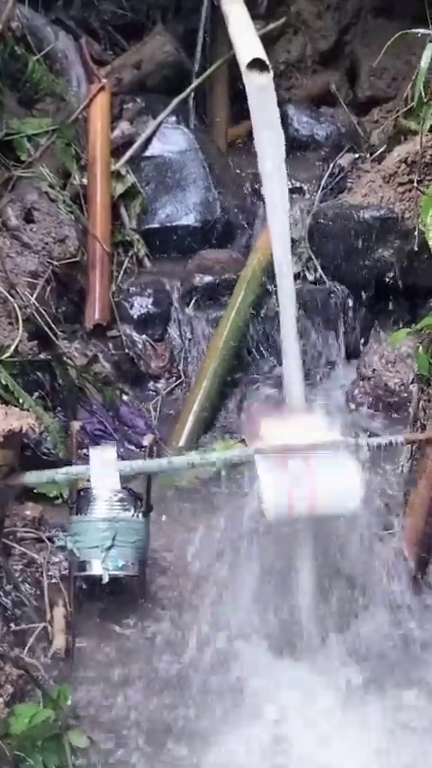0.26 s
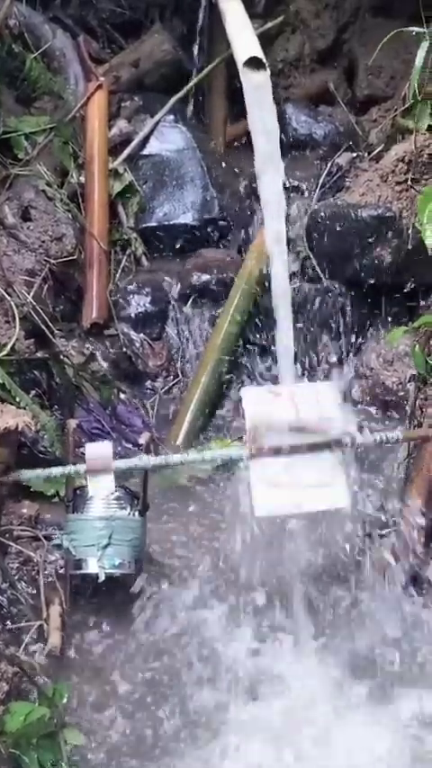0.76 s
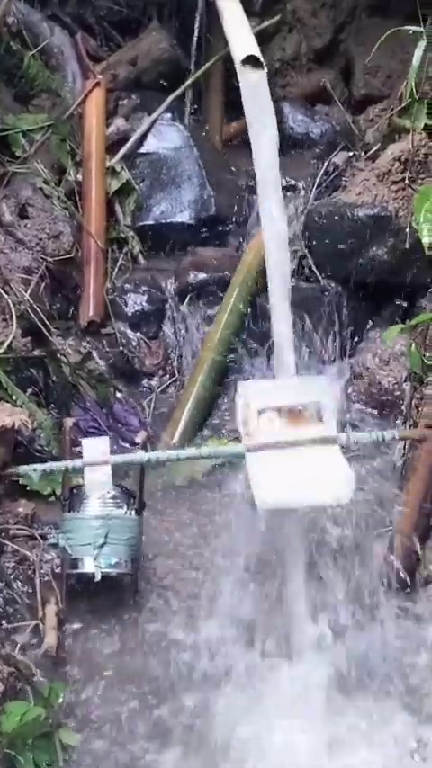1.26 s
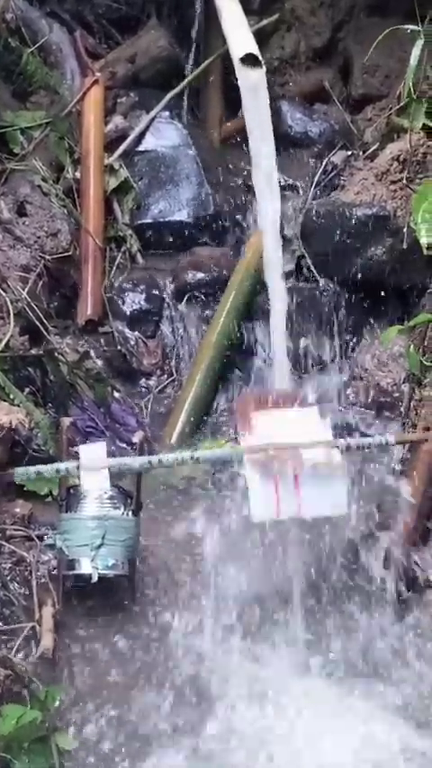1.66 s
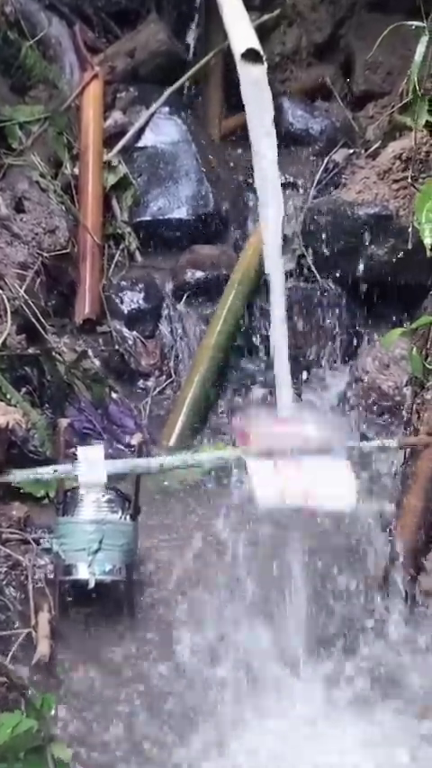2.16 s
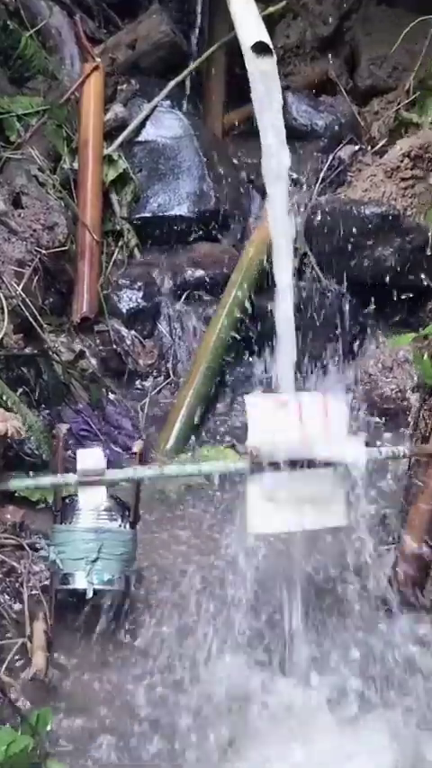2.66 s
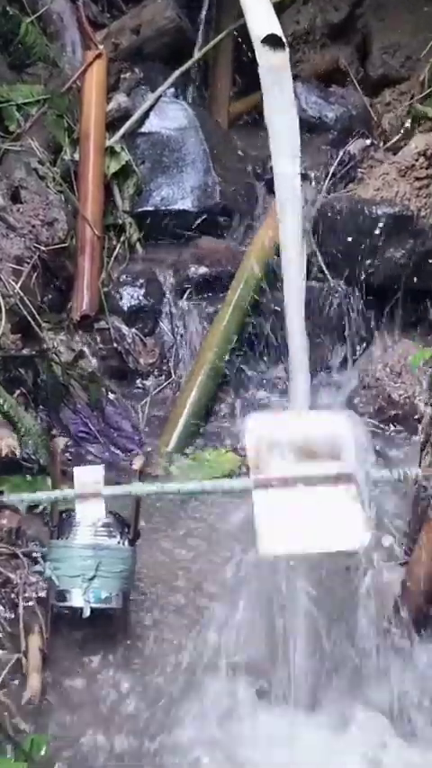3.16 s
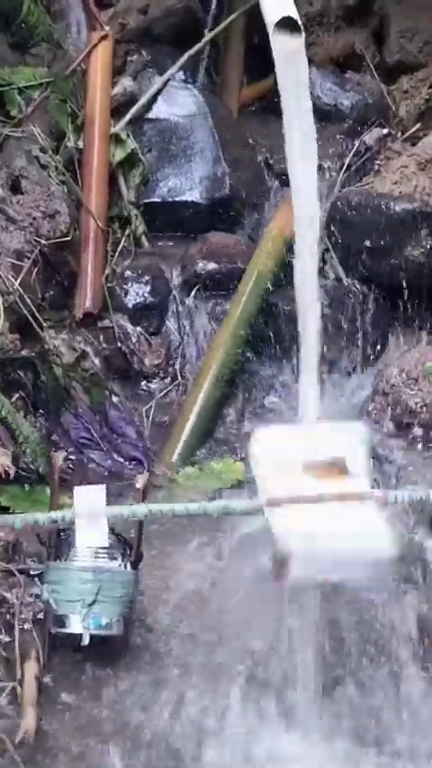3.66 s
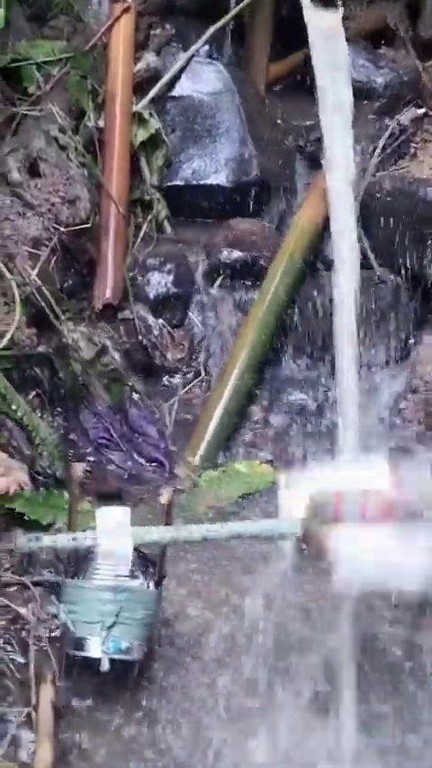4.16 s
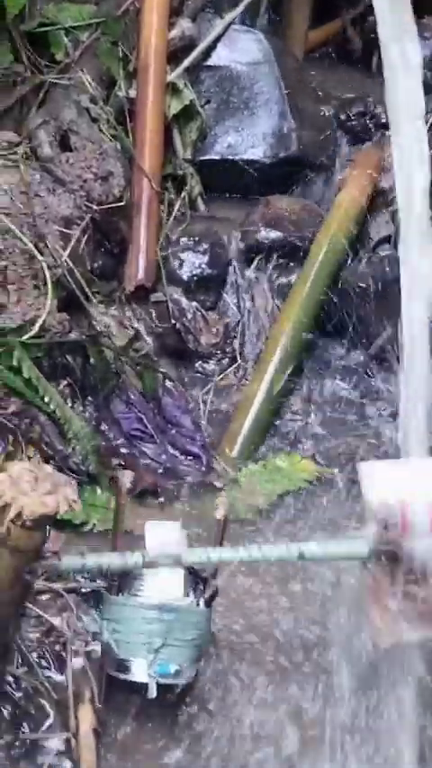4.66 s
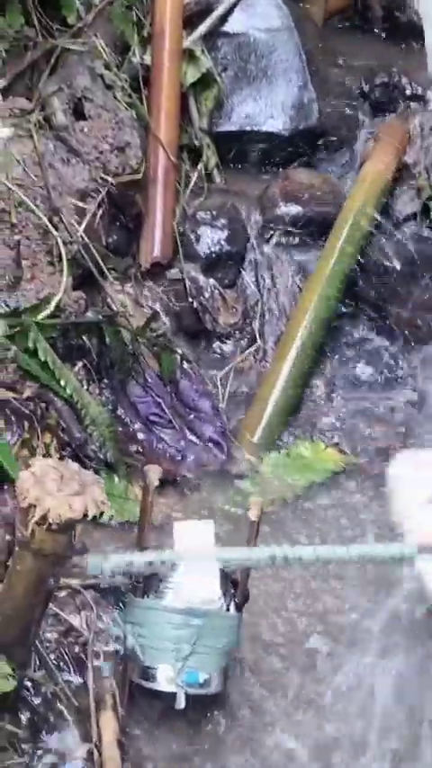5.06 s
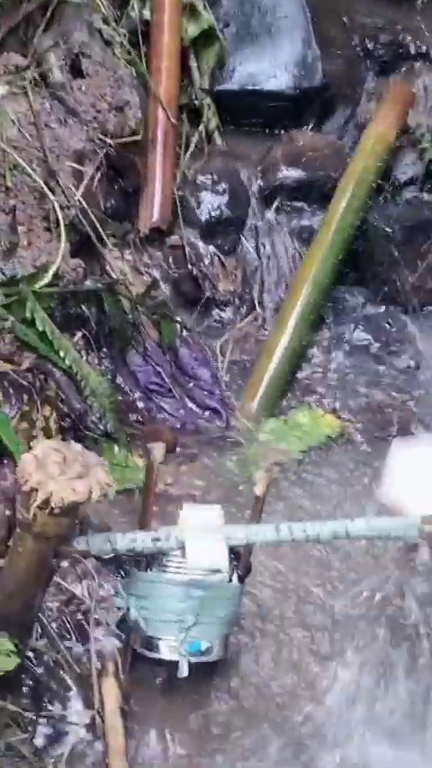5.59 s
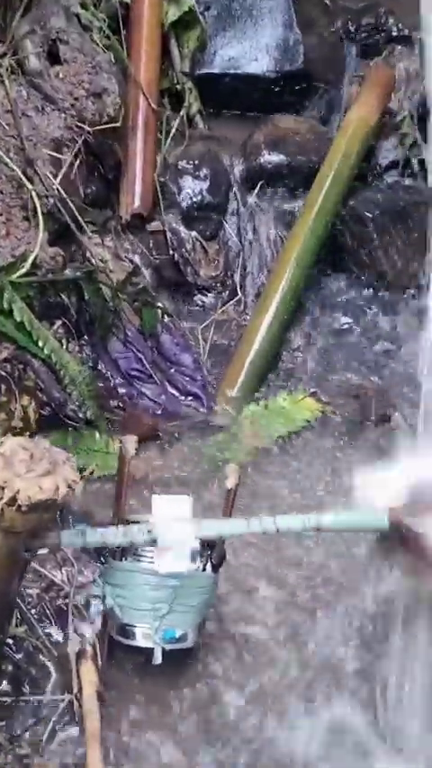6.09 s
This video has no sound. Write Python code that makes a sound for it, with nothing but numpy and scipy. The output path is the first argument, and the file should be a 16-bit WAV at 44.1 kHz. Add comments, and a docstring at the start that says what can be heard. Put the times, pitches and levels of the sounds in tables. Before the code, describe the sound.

From the first instant, a tin can is drummed by a tab on the shaft of a small, water-driven paddle wheel. The knocks come about twenty-five a second in a slightly lopsided, wavering roll, each a short hollow note with a bright, buzzing metal rattle. Underneath, water spatters steadily into a pool, with fine bubbling and scattered low gulps. From about 2.5 to 4.5 seconds the close microphone moves from the wheel to the can, and the can's tone changes colour. A thin, high metallic ring swells around 3.5 to 4.5 seconds, and light squeaks surface near 2.9, 4.2 and 5.1 seconds. Two small drips chirp at about 4.5 and 4.8 seconds. The drumming and splashing continue without a break to the end, a little after 6 seconds. The space is outdoors, with only a faint, short echo from a stony bank.

```python
"""Water wheel drumming on a tin can

A jet spins a small paddle wheel above a pool; a tab on its shaft strikes a tin can four times a turn.
Each knock booms the lid and rattles the wall, which the tab also rubs into singing and squeaking.
The water splashes, bubbles, drips and gulps, and a stony bank echoes the can faintly.
Half-way through, the listener moves from the wheel to the can, which shifts the balance of the modes."""
import sys
import numpy as np
from scipy import signal
from scipy.fft import rfft, irfft, next_fast_len
from scipy.io import wavfile

SR = 44100
rng = np.random.default_rng(int(sys.argv[2]) if len(sys.argv) > 2 else 0)


def master_out(mix):
    """Clip the mix to full scale and print it as 16-bit PCM to the path in sys.argv[1]."""
    frames = np.transpose(np.atleast_2d(mix))
    ceiling = np.clip(frames, -1, 1)
    pcm = np.round(ceiling * 32767).astype(np.int16)
    wavfile.write(sys.argv[1], SR, pcm)


N = 279153
TIME = np.arange(N) / SR
KNOCK_SAMPLES = 2646


def undb(db):
    return 10 ** (np.asarray(db) / 20)


def unit(x):
    """Scale each row to rms 1."""
    return x / np.sqrt(np.mean(x ** 2, axis=-1, keepdims=True))


def curve(rows, at_s):
    """Join (seconds, value) rows by straight lines."""
    return np.interp(at_s, *np.transpose(rows))


def add(out, start_s, sound):
    """Mix a sound in at start_s."""
    i = max(int(start_s * SR), 0)
    out[i:i + len(sound)] += sound[:max(N - i, 0)]


def resonance(f, hz, width_hz):
    """Magnitude response of one mode, 1 at its centre."""
    return np.abs(1j * f * width_hz / (hz ** 2 - f ** 2 + 1j * f * width_hz))


def bubble(hz, cycles, glide):
    """An air pocket swells within a cycle, rings and rises in pitch as it nears the surface."""
    age = np.arange(int(cycles * SR / hz)) / (cycles * SR / hz)
    tone = np.sin(2 * np.pi * cycles * (age + glide * age ** 2 / 2))
    swell = 1 - np.exp(-(age * cycles) ** 2)
    return tone * swell * np.exp(-np.log(100) * age)


# Wheel speed, wavering with the jet. Each row: time in seconds, turns per second.
WHEEL_SPEED = [(0, 6.029), (0.28, 6.534), (0.76, 6.229), (0.84, 6.624), (1.25, 6.015), (1.41, 6.67),
               (1.79, 6.178), (2.61, 6.373), (2.71, 6.21), (3.32, 6.312), (3.42, 6.432), (3.9, 6.174),
               (4.06, 6.557), (4.4, 6.259), (5.32, 6.438), (5.43, 5.656), (5.53, 6.308), (6.33, 6.004)]

def wheel_passes(phases):
    """Times at which the wheel passes the given phases (0-1) of a turn, and each pass's phase index."""
    turns = np.cumsum(curve(WHEEL_SPEED, TIME)) / SR
    due = (np.arange(int(turns[-1]) + 1)[:, None] + phases).ravel()
    due = due[due < turns[-1]]
    return np.interp(due, turns, TIME), np.arange(len(due)) % len(phases)


# Spray spectrum. Each row: frequency in Hz, relative gain in dB.
SPRAY_SPECTRUM = [(25, -25), (80, -36), (130, 3.5), (190, 3), (400, -22), (1200, 13), (2400, 0),
                  (5000, 6.5), (7100, 4.5), (8000, -3.5), (9800, -89), (12000, -5), (15500, -44)]

def spray(level_db=-43, grit_db=4.5, surge_db=3, surges_per_s=60):
    """Spray patters on the pool in quick surges."""
    noise, grit = rng.standard_normal((2, N))
    surge = np.interp(TIME * surges_per_s, np.arange(N // 100), rng.standard_normal(N // 100))
    patter = noise * undb(grit_db * grit + surge_db * surge)
    hz, db = np.transpose(SPRAY_SPECTRUM)
    size = next_fast_len(N)
    f = np.maximum(np.fft.rfftfreq(size, 1 / SR), 1)
    gain = undb(np.interp(np.log(f), np.log(hz), db))
    return undb(level_db) * unit(irfft(rfft(patter, size) * gain, size)[:N])


def foam(level_db=-48, spread_db=6.5, count=2400, low_hz=170, high_hz=4500):
    """Small bubbles ring at random, most of them faint."""
    out = np.zeros(N)
    for when, pitch, faintness in rng.random((count, 3)):
        hz = low_hz * (high_hz / low_hz) ** pitch
        gain = undb(-spread_db * np.log(faintness + .04)) * (hz / 1000) ** 0.53
        add(out, when * N / SR, gain * bubble(hz, cycles=9.9, glide=0.13))
    return undb(level_db) * unit(out)


# Nearby drops. Each row: start in seconds, level in dB, starting pitch in Hz.
NEAR_DROPS = [(4.522, -28, 1330), (4.844, -22.5, 1340)]

def drips():
    """Single drops fall close by and chirp."""
    out = np.zeros(N)
    for start_s, db, hz in NEAR_DROPS:
        add(out, start_s, undb(db) * bubble(hz, cycles=45, glide=0.4))
    return out


# Where the paddles throw water into the pool. Each entry: phase of the turn, 0-1.
THROW_PHASES = [0.027, 0.52, 0.712]
# Largest air pockets. Each row: start in seconds, relative level in dB, starting pitch in Hz.
BIG_GULPS = [(0.55, -29, 301), (0.744, -35, 312), (0.87, -32.5, 290), (1.215, -34, 200), (2.322, -33, 225),
             (2.958, -31, 247), (3.752, -31.5, 258), (4.036, -35, 194), (4.122, -37, 165),
             (4.223, -34, 199), (4.428, -36, 222), (4.698, -33, 194), (5.016, -28, 258), (5.171, -36, 179),
             (5.699, -38, 168), (6.107, -31.5, 194), (6.19, -34, 200), (6.276, -33.5, 170.6)]

def gulps(gain_db=5, cavity_hz=165, cavity_db=-2, small_db=-52, small_vary_db=4, small_hz=230):
    """A slug of water punches a cavity that thuds while a bubble rings; each throw makes a small gulp."""
    out = np.zeros(N)
    times, _ = wheel_passes(np.array(THROW_PHASES))
    level_jitter, pitch_jitter = rng.standard_normal((len(times), 2)).T
    small_gulps = zip(times, small_db + small_vary_db * level_jitter, small_hz * np.exp(.2 * pitch_jitter))
    for start_s, db, hz in [*BIG_GULPS, *small_gulps]:
        thud_hz = cavity_hz * np.exp(0.053 * rng.standard_normal())
        add(out, start_s, undb(db + gain_db) * bubble(hz, cycles=7, glide=0.21))
        add(out, start_s, undb(db + gain_db + cavity_db) * bubble(thud_hz, cycles=7, glide=0.45))
    return out


def bank_echo(x, echo_db=-25, delay_s=0.011, t60_s=0.21):
    """The stony bank adds a short, faint echo."""
    t = np.arange(SR // 4) / SR
    tail = rng.standard_normal(len(t)) * np.exp(-np.log(1000) * t / t60_s) * (t > delay_s)
    return x + undb(echo_db) * signal.fftconvolve(x, tail / np.linalg.norm(tail))[:N]


# Lid modes. Each row: nominal frequency in Hz, t60 in seconds, signed share in a glancing stroke,
# in a rebound, in a square stroke, level change beside the can in dB.
LID_MODES = [(621, 0.12, 0.058, 0.058, 0.018, -4), (671.7, 0.1, 0.018, 0.059, 0.016, 12),
             (702.8, 0.065, -0.098, -0.039, -0.023, 15.5), (796.9, 0.04, -0.1, -0.54, -0.49, 6.5),
             (843.9, 0.061, 0.69, 0.56, 0.87, 4), (905.6, 0.073, -0.55, 0.57, -0.28, -9.5),
             (945.7, 0.065, -0.023, -0.49, -0.12, -6), (1098, 0.041, .006, 0.0087, .003, 19.5),
             (2099, 0.092, 0.041, 0.03, 0.027, 2.5)]

def lid_boom(position, sag=0.023, scatter=.05, detune=.006, damping_vary=.14, lag_s=.0001, rise_s=.0007):
    """Close lid modes start against each other, so each boom swells, then beats; rms 1 per knock."""
    hz, t60_s, glancing, rebound, square, beside_db = np.transpose(LID_MODES)
    count = len(position)
    t = np.maximum(np.arange(KNOCK_SAMPLES) / SR - lag_s, 0)
    jitter = rng.standard_normal((count, len(hz) + 2))
    share = np.array([glancing, rebound, square, rebound])[np.arange(count) % len(TAB_STROKES)]
    share = share * undb(np.outer(position, beside_db)) * (1 + scatter * jitter[:, 2:])
    # the tab rests on the tin differently each time, shifting pitch and damping
    phase = 2 * np.pi * np.outer(1 - sag * position + detune * jitter[:, 0], t)
    loss = np.log(1000) * np.outer(np.exp(damping_vary * jitter[:, 1]), t)
    ring = sum(share[:, [m]] * np.sin(hz[m] * phase) * np.exp(-loss / t60_s[m]) for m in range(len(hz)))
    return unit(ring * (1 - np.exp(-(t / rise_s) ** 2)))


def tab_contacts(count, rise_s=0.0011, scrape_s=0.013, grit_db=3.5, repeat=0.38):
    """The tab chatters, then scrapes off: tiny uneven contacts that partly repeat from turn to turn."""
    stroke = np.arange(count) % len(TAB_STROKES)
    t = np.arange(KNOCK_SAMPLES) / SR
    hold_s, fall_s, scrape_db = np.transpose(TAB_STROKES)[-3:, :, None]
    chatter = np.exp(-np.maximum(t - hold_s, 0) / fall_s)
    scrape = undb(scrape_db) * np.exp(-t / scrape_s)
    force = np.minimum(t / rise_s, 1) * (chatter + scrape)
    noise, grit = rng.standard_normal((2, count, KNOCK_SAMPLES))
    fresh = unit(noise * undb(grit_db * grit))
    pattern = rng.standard_normal((len(TAB_STROKES), KNOCK_SAMPLES))
    return (fresh + repeat * pattern[stroke]) * force[stroke]


# Singing and squeaking modes. Each row: time in seconds, level against the rest of the wall in dB.
SING_LEVELS = [(0, -10.5), (2.7, -8.5), (3.2, -5), (3.7, 0.5), (4.1, 0), (4.5, -4), (4.9, -7), (5.1, -17),
               (6.33, -3.5)]
SQUEAK_LEVELS = [(0, -20), (2.75, -30), (2.87, -11), (3.15, -21), (3.6, -23), (4.15, -9), (4.5, -18.5),
                 (5.1, -6), (5.3, -18), (6.33, -41)]

def rubbed_mode(f, times, levels, hz, width_hz):
    """The tab's edge rubs one wall mode into a tone; one power spectrum per knock."""
    power = resonance(f, hz, width_hz) ** 2
    return np.outer(undb(2 * curve(levels, times)), power / power.sum())


# Wall modes. Each row: frequency in Hz, width in Hz, relative level in dB at the wheel, beside the can.
WALL_MODES = [(1084, 34, -32, -10.5), (1252, 132, -17.5, -15), (1560, 32, -12, -38), (1740, 14, -32, -6),
              (2024.5, 39.4, -6.5, -5), (2714, 38, -12.5, -6), (2911, 37, -4.5, -6.5), (2988, 38, -5, -4),
              (3595, 25, -49, -9), (3837, 52, -4, -10.5), (4117, 49, -12.5, -12.5), (4467, 57, -19, -7),
              (4713, 47, -15, -12), (5110, 110, -21, -18.5), (5550, 40, -14, -8.5), (5855, 69, -15, -11.5),
              (6578, 79, -13.5, -13.5), (6972, 68, -11, -14), (7163, 66, -10.5, -12), (8080, 39, -24, -21),
              (8260, 57, -22, -29), (11280, 59, -27, -36), (11820, 140, -25.5, -26.5),
              (13000, 52, -33, -41)]

def wall_rattle(times, position, vary_db=2, low_cut_hz=1050, shelf_hz=7500, shelf_db=-4, clank_db=-24):
    """The tab's contacts ring the wall modes and the can clanks dully on its mount; rms 1 per knock."""
    size = 4096
    f = np.fft.rfftfreq(size, 1 / SR)
    contacts = rfft(tab_contacts(len(times)), size)
    hz, width_hz, wheel_db, beside_db = np.transpose(WALL_MODES)
    mode_db = wheel_db + np.outer(position, beside_db - wheel_db)
    mode_db += vary_db * rng.standard_normal(mode_db.shape)
    power = undb(2 * mode_db) @ resonance(f, hz[:, None], width_hz[:, None]) ** 2
    power *= undb(2 * shelf_db * (f > shelf_hz)) / (1 + (low_cut_hz / (f + 1)) ** 2)
    power += undb(2 * clank_db) * resonance(f, hz=540, width_hz=90) ** 4
    power /= power.sum(axis=1, keepdims=True)
    power += rubbed_mode(f, times, SING_LEVELS, hz=3028, width_hz=22)
    power += rubbed_mode(f, times, SQUEAK_LEVELS, hz=5680, width_hz=170)
    # the cepstrum turns the summed power into a causal ring
    cepstrum = irfft(np.log(power + 1e-9))
    cepstrum[:, 0] /= 2
    response = np.exp(rfft(cepstrum[:, :size // 2], size))
    return unit(irfft(contacts * response, size)[:, :KNOCK_SAMPLES])


def can_radiation(x, band_hz=(390, 13500)):
    """A small can radiates almost no bass, and its highest ring is weak."""
    return signal.sosfilt(signal.butter(2, band_hz, "bandpass", fs=SR, output="sos"), x)


# Strokes of a turn: glancing, rebound, square, light rebound. Each row: phase 0-1, relative lid and wall
# levels in dB, lid change beside the can in dB, share of a jolt 0-1, chatter hold and fall in seconds,
# scrape against chatter in dB.
TAB_STROKES = [(0.2203, -11.4, -23.3, -0.8, 1, 0.0094, 0.001, 13),
               (0.4471, -9.1, -21.9, 0, 0, 0.0094, 0.003, -6),
               (0.7576, -8.9, -21, -0.2, 0, 0.0063, 0.0035, 5.5),
               (0.933, -11.8, -25, 1.2, 1, 0.0094, 0.0048, -26)]
# Listener's path. Each row: time in seconds, position from 0 at the wheel to 1 beside the can.
LISTENER_PATH = [(0, 0.16), (2.5, 0.059), (3.5, 0.58), (4.6, 1), (6.33, 1)]
# The loose shaft jolts towards the can, so light strokes land harder. Each row: time in seconds, gain in dB.
SHAFT_JOLTS = [(1.42, 2.6), (1.9, 1.3), (2.62, 1.3), (2.85, 2), (3.34, 2.6), (4.11, 1.6), (5.39, 1.8),
               (5.87, 2.3)]
# Slow drift of the rattle. Each row: time in seconds, gain in dB.
RATTLE_DRIFT = [(0, 0), (2.3, 0.2), (2.9, -1), (3.7, 1), (4.55, 2), (5.1, 0.3), (5.6, -0.5), (6.33, 1.2)]

def can_knocks(gain_db=-7, boom_vary_db=.4, rattle_vary_db=.6, jolt_s=0.09):
    """The tab strikes four times a turn; each knock booms the lid and rattles the wall."""
    strokes = np.array(TAB_STROKES)
    times, stroke = wheel_passes(strokes[:, 0])
    lid_db, wall_db, beside_db, jolt_share = strokes[stroke, 1:5].T
    position = curve(LISTENER_PATH, times)
    jolt_db = jolt_share * sum(db * np.exp(-((times - s) / jolt_s) ** 2) for s, db in SHAFT_JOLTS)
    boom_jitter, rattle_jitter = rng.standard_normal((len(times), 2)).T
    boom_db = gain_db + lid_db + jolt_db + beside_db * position + boom_vary_db * boom_jitter
    rattle_db = gain_db + wall_db + jolt_db + curve(RATTLE_DRIFT, times) + rattle_vary_db * rattle_jitter
    knocks = undb(boom_db)[:, None] * lid_boom(position)
    knocks += undb(rattle_db)[:, None] * wall_rattle(times, position)
    out = np.zeros(N)
    for start_s, knock in zip(times, knocks):
        add(out, start_s, knock)
    # the wheel is already turning: a last stroke, 8 ms old, still rings at the start
    add(out, 0, knocks[len(strokes) - 1][SR // 125:])
    return can_radiation(out)


def scene():
    """The drumming can over the water, in mono."""
    return (bank_echo(can_knocks()) + spray() + foam() + drips() + gulps())[None]


def record(dry, ceiling=.85, top_hz=15700):
    """Round the highest peaks and cut the top treble."""
    rounded = dry / (1 + (dry / ceiling) ** 8) ** (1 / 8)
    return signal.sosfilt(signal.ellip(8, .2, 80, top_hz, fs=SR, output="sos"), rounded)


dry = scene()
out = record(dry)
master_out(out)
```